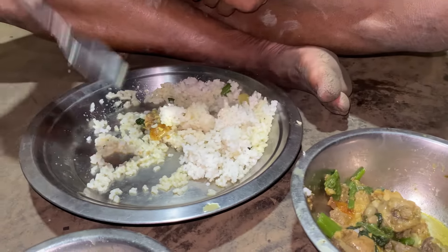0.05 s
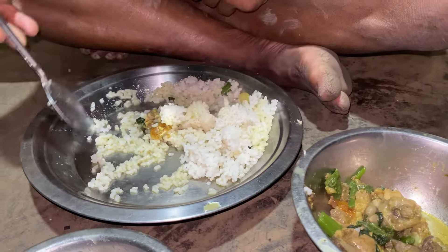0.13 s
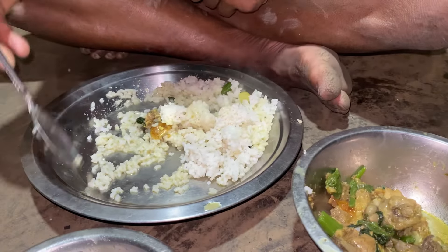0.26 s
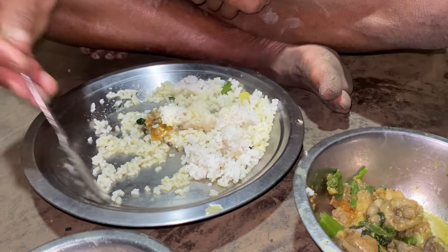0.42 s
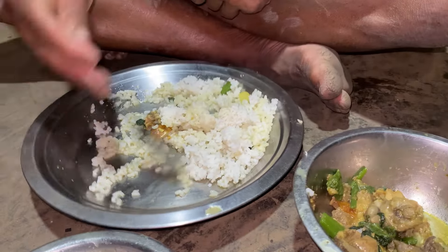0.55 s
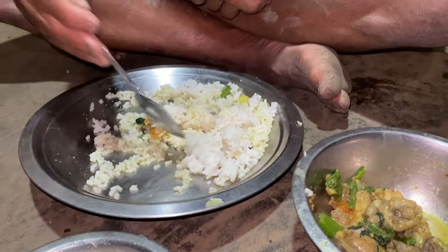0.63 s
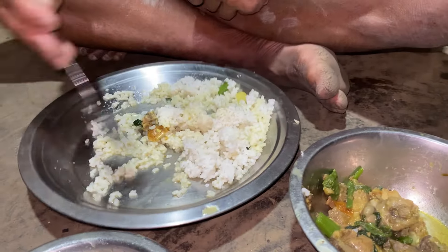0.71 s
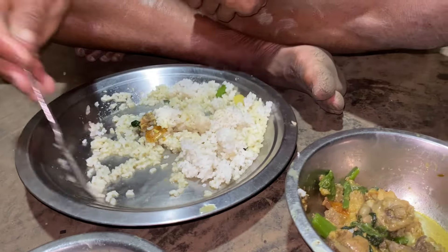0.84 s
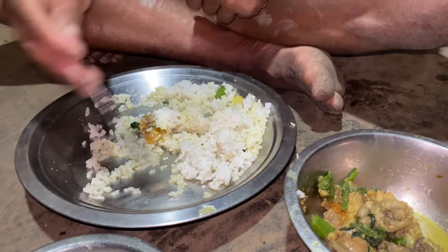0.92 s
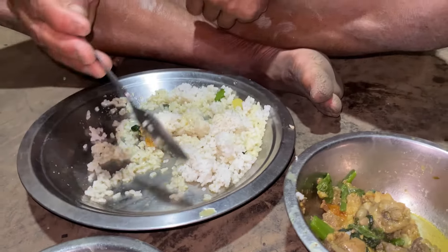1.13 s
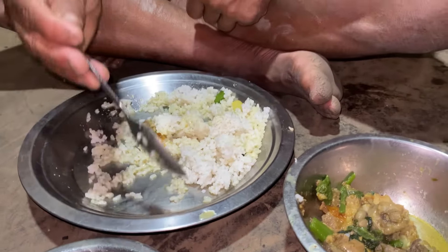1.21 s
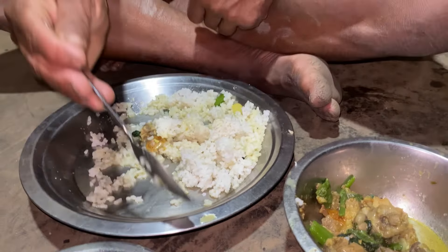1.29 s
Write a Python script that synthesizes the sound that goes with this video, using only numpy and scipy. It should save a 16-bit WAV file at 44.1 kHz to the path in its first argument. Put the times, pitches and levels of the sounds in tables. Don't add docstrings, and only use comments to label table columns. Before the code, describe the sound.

A metal spoon on a steel plate of rice, heard close in stereo. A clink at 0.2 seconds, then bright ringing taps and a short scrape from 0.37 to 0.52. Faint muffled touches follow around 0.65 to 0.75, a loud sharp clink with a brief skid at 0.8, then soft rice grains near 0.95 and a tiny dish note at 1.2. Small hard room, faint crickets, low hum.

```python
import sys
import numpy as np
from scipy import signal
from scipy.fft import rfft, irfft, next_fast_len
from scipy.io import wavfile
from scipy.ndimage import map_coordinates

SR = 44100
rng = np.random.default_rng(int(sys.argv[2]) if len(sys.argv) > 2 else 0)


def to_wav(sig):
    pcm = np.clip(np.atleast_2d(sig), -1, 1) * 32767
    pcm = np.round(pcm).astype(np.int16)
    wavfile.write(sys.argv[1], SR, pcm.T)


def attenuation_scalar(level_db):
    decades = np.asarray(level_db, float) / 20
    return 10 ** decades


N = 59535
TIME = np.arange(N) / SR


def unit(x):
    return x / np.sqrt(np.mean(x ** 2) + 1e-20)


def along(points, hz):
    f, value = np.transpose(points)
    return np.interp(np.log(hz + 1), np.log(f + 1), value)


def gain_curve(rows):
    s, db = np.transpose(rows)
    after = db[-1] if s[-1] > 1.2 else -120
    return attenuation_scalar(np.interp(TIME, s, db, left=-120, right=after))


def wobble(rate):
    knots = rng.standard_normal(int(N / SR * 400) + 4)
    return map_coordinates(knots, [np.arange(N) * min(rate, 400) / SR])


def filtered(x, response):
    m = next_fast_len(N + SR // 2)
    return irfft(rfft(x, m) * response(np.fft.rfftfreq(m, 1 / SR)), m)[..., :N]


def colour(points):
    return lambda hz: attenuation_scalar(along(points, hz))


def resonances(modes):
    def response(f):
        total = 0
        for centre, db, t60 in modes:
            damping = 1j * f * 2.2 / t60
            total = total + attenuation_scalar(db) * damping / (centre * centre - f * f + damping)
        return total
    return response


def grains(grainy_db, rate):
    return unit(rng.standard_normal((2, N)) * attenuation_scalar(grainy_db * wobble(rate)))


def hiss(response):
    return unit(filtered(rng.standard_normal((2, N)), response))


def ring(modes, t, pitch, fast):
    hz, db, t60 = np.transpose(modes)[..., None]
    louder, sharper = rng.standard_normal((2, len(hz), 1))
    strength = attenuation_scalar(db + 1.5 * louder - 60 * t / t60 * fast)
    tones = np.sin(2 * np.pi * pitch * hz * (1 + .006 * sharper) * t)
    return (strength * tones).sum(0)


# t/s, rim level/dB, bowl level/dB, spoon level/dB, bowl pitch f/Hz
TAPS = [(0.157, -58, -32, -46, 1140), (0.199, -36, -33, -53.5, 1710), (0.2016, -30, -34, -23, 1970),
        (0.2081, -38, -11.5, -12.5, 2010), (.371, -1.5, -21.5, -22.5, 1030), (0.4, -4, -42, -40, 1190),
        (0.449, -2, -24, -19, 1210), (0.4695, -27, -9, -12, 1268), (.645, -34, -32, -47, 1150),
        (0.649, -47, -29.5, -24.5, 660), (0.701, -56.5, -46, -28.5, 1010), (0.709, -58.5, -58, -33.5, 980),
        (0.748, -37, -55, -29.5, 940), (.752, -55, -28.5, -55.5, 877), (0.762, -55, -30, -62, 1085),
        (0.778, -60, -30, -59, 1110), (0.8063, -2.5, -14.5, -41.5, 1118), (0.8079, 3, -13.5, -42, 1372),
        (0.934, -55, -24.5, -55, 460), (.937, -63, -34, -50.5, 680)]
# f/Hz, level/dB, t60/s
RIM = [(4300, -7, .03), (4840, -9, .025), (5285, -7, .025), (5620, -8, .025), (5812, -1, .035),
       (5858, 0, .05), (6142, -3, .04), (6320, -6, .025), (7000, -7, .025), (7240, -7, .03),
       (7650, -10, .02), (11100, -10, .02), (12070, -8, .02), (12700, -9, .02)]
# multiple of its pitch, level/dB, t60/s
BOWL = [(.21, -24, .14), (.31, -22, .05), (.6, -26, .05), (1.0, 0, .036), (1.08, -15, .025),
        (1.15, -12, .03), (1.83, -20, .04)]
# f/Hz, level/dB, t60/s
SPOON = [(230, -19, .07), (420, -15, .05), (1750, -9, .03), (2120, -6, .03), (2400, -6, .025),
         (2694, 0, .035), (2792, -2, .045), (3130, -4, .03), (3930, -5, .03), (4290, -8, .04),
         (6800, -8, .02)]
# t/s, f/Hz, level/dB, t60/s
SPOTS = [(0.2008, 6650, -21, 0.062), (0.203, 3230, -9.5, 0.017), (0.208, 2850, -36, 0.052),
         (.207, 1953, -18, 0.026), (.207, 406, -22.5, 0.051), (.206, 240, -27.5, 0.064),
         (0.207, 6460, -19.5, .012), (0.373, 1043, -27, 0.093), (.371, 1345, -30, 0.12),
         (0.37, 2440, -22.5, 0.042), (0.372, 4500, -15, 0.013), (.371, 6250, -10.5, 0.013),
         (.398, 2265, -19, .035), (.398, 1200, -31.5, 0.096), (0.425, 7240, -19.5, 0.073),
         (0.452, 4880, -17, 0.053), (.464, 7086, -12.5, .04), (0.4694, 1170, -1.5, 0.036),
         (.485, 1161, -24.5, 0.11), (.485, 1090, -29.5, 0.12), (.471, 344, -18, .05),
         (.471, 780, -32, 0.041), (.371, 650, -32, 0.072), (.371, 242, -35, 0.14), (.451, 1260, -17, .06),
         (0.806, 1082, -20.5, 0.16), (0.808, 1341, -21.5, 0.13), (.807, 1220, -22, 0.1),
         (0.808, 1450, -18.5, 0.038), (0.809, 339, -27.5, 0.062), (.808, 678, -32, 0.13),
         (0.808, 4265, -14, 0.032), (0.808, 4770, -12.5, 0.027), (.807, 5160, -15.5, .04),
         (0.811, 4510, -19, 0.028)]
# t/s, level/dB
CLICKS = [(.157, -42), (0.1989, -12), (.208, -20.5), (0.372, -15), (0.397, -14.5), (0.451, -15),
          (0.4687, -8.5), (0.513, -25), (0.643, -36.5), (0.6483, -31.5), (0.683, -42), (.709, -41.5),
          (.749, -41.5), (.807, -4.5), (0.808, -18.5)]
# f/Hz, level/dB
CLICK_COLOUR = [(180, -50), (300, -46.5), (1290, 5), (3100, 1.5), (6200, 5.5), (9000, 21), (12600, 2),
                (14400, -32)]


def taps():
    ringing, cracks = np.zeros(N + SR), np.zeros(N + SR)
    t = np.arange(SR // 4) / SR
    rise = 1 - np.exp(-t / .0006)
    crack_t60 = .013
    soft_db, muffle = -25, .14
    for s, rim_db, bowl_db, spoon_db, bowl_hz in TAPS:
        fast = 1.5 + muffle * max(soft_db - max(rim_db, bowl_db, spoon_db), 0)
        rim = attenuation_scalar(rim_db - 9.5) * ring(RIM, t, 0.97, 2.2 * fast)
        bowl = attenuation_scalar(bowl_db) * ring(BOWL, t, bowl_hz, fast)
        spoon = attenuation_scalar(spoon_db - 4.0) * ring(SPOON, t, 0.97, fast)
        ringing[round(s * SR):][:len(t)] += rise * (rim + bowl + spoon)
    for s, hz, db, t60 in SPOTS:
        tone = attenuation_scalar(db - 60 * t / t60) * np.sin(2 * np.pi * hz * t)
        ringing[round(s * SR):][:len(t)] += rise * tone
    for s, db in CLICKS:
        burst = attenuation_scalar(db - 60 * t / crack_t60) * rng.standard_normal(len(t))
        cracks[round(s * SR):][:len(t)] += rise * burst
    return ringing[:N] + filtered(cracks[:N], colour(CLICK_COLOUR))


def radiated(x):
    return filtered(x, lambda hz: (1j * hz / (190 + 1j * hz)) ** 2)


# t/s, level/dB
DRAG = [
    (.369, -54),
    (.373, -22),
    (.39, -26.5),
    (.44, -30.5),
    (.458, -27),
    (.468, -14.5),
    (.475, -51),
    (.51, -30),
    (.525, -44.5),
]
# t/s, level/dB
SKID = [
    (.806, -53),
    (.812, -23),
    (.822, -50),
    (.826, -28.5),
    (.838, -34),
    (.853, -33.5),
    (.857, -40),
    (.875, -61.5),
]
# f/Hz, level/dB
DRAG_COLOUR = [(800, -9.5), (2500, -2), (3700, -8), (5600, -6), (8000, -12), (12500, -2), (14000, 5),
               (16500, -36)]
# t/s, level/dB, half
# length/s, tone f/Hz
RUBS = [(0.188, -35.5, .002, 5130), (.205, -11.5, 0.002, 2740), (0.3981, -10, .0012, 5790),
        (0.402, -13, .0015, 5800), (.4245, -15.5, .0035, 5860), (.432, -20, .002, 5300),
        (0.4393, -15.5, .0015, 5850), (0.444, -19.5, .002, 6100), (.452, -18.5, .002, 5820),
        (0.4734, -21.5, .002, 5880), (0.737, -42, .006, 6100), (.7985, -36, .002, 5850),
        (0.8025, -23, .0015, 5900), (0.826, -18, .0015, 6250), (0.849, -28.5, .003, 5850)]


def drag():
    slips = grains(2.2, 350)
    grit = unit(filtered(slips, colour(DRAG_COLOUR)))
    singing = unit(filtered(slips, resonances(RIM)))
    rubs = 0
    for s, db, half, hz in RUBS:
        swell = attenuation_scalar(db) * np.exp(-((TIME - s) / half) ** 2)
        rubs = rubs + swell * (np.sin(2 * np.pi * hz * TIME) + attenuation_scalar(-8) * singing)
    dragging = gain_curve(DRAG) * (grit + attenuation_scalar(-1) * singing)
    skidding = gain_curve(SKID) * (grit + attenuation_scalar(-3.5) * singing)
    return dragging + skidding + rubs


# t/s, level/dB
RICE = [(0, -45), (.1, -67.5), (.16, -41), (.196, -43.5), (.202, -28.5), (.225, -29.5), (.31, -46),
        (.6, -51), (.65, -44.5), (.68, -61), (.75, -47.5), (.79, -51), (.88, -43.5), (.94, -34),
        (1.0, -38.5), (1.07, -59.5), (1.18, -63), (1.3, -48.5)]
# f/Hz, level/dB
RICE_COLOUR = [(150, -12), (700, -17), (1500, -5.5), (3000, -0.5), (6000, -4), (9000, -4.5), (12500, -4.5),
               (16000, -7.5)]
# t/s, level/dB
PRESS = [(0, -3.5), (.1, 4.5), (.2, -20), (.6, -4), (.88, -2), (.94, -12), (1.05, 1.5), (1.12, -13),
         (1.35, -14)]
# f/Hz, level/dB, t60/s
LOADED_PLATE = [(450, -3, .03), (700, 0, .03), (1360, -2, .03), (1800, -4, .025), (2650, -6, .03)]


def rice():
    push = grains(1.5, 220)
    crunch = unit(filtered(push, colour(RICE_COLOUR)))
    patches = gain_curve(PRESS) * attenuation_scalar(2.1 * wobble(25))
    voice = patches * unit(filtered(push, resonances(LOADED_PLATE)))
    return gain_curve(RICE) * (crunch + voice)


# t/s, level/dB, f/Hz, rise/s, t60/s
DISH = (1.215, -32, 1104, .007, .085)


def ping():
    s, db, hz, rise, t60 = DISH
    t = np.maximum(TIME - s, 0)
    swell = 1 - np.exp(-(t / rise) ** 2)
    return attenuation_scalar(db - 60 * t / t60) * swell * np.sin(2 * np.pi * hz * t)


# f/Hz, t60/s
ROOM = [(200, 0.56), (2000, 0.16), (6000, 0.25), (14000, 0.2)]


def room(x):
    hz, t, z = signal.stft(rng.standard_normal((2, SR // 2)), SR, nperseg=256)
    fading = attenuation_scalar(-60 * t / along(ROOM, hz)[:, None])
    tail = signal.istft(z * fading, SR, nperseg=256)[1]
    late = np.pad(x, (200, 0))[None]
    return signal.fftconvolve(late, tail / np.linalg.norm(tail[0]), axes=1)[:, :N]


# f/Hz, width/Hz, level/dB, swells per s
CRICKETS = [
    (3584, 220, -52.5, 74),
    (5176, 95, -56, 30),
]


def crickets():
    song = 0
    for hz, width, db, rate in CRICKETS:
        band = hiss(lambda f: 1 / (1 + ((f - hz) / width) ** 4))
        song = song + attenuation_scalar(db + 2.2 * wobble(rate)) * band
    return song


# t/s, level/dB
STIR = [(0, 3), (.08, -1.5), (.3, 6), (.6, -0.5), (1.06, -8), (1.12, -3), (1.19, 5.5), (1.35, -0.5)]
# f/Hz, level/dB
AIR = [(600, -17), (1000, -4.5), (2500, -4), (4000, 1), (6000, -4.5), (9000, -1), (13000, -7),
       (16000, -3.5)]


def air():
    drift = attenuation_scalar(-49.5 + 1.2 * wobble(2.8))
    return gain_curve(STIR) * drift * hiss(colour([(150, -19)] + AIR))


# t/s, level/dB
HUM = [(0, -39.5), (.05, -56), (.13, -49), (.3, -55.5), (.5, -53.5), (.75, -55), (.9, -58.5), (.97, -52.5),
       (1.05, -67), (1.35, -60)]
# f/Hz, level/dB
HUM_COLOUR = [(25, -29.5), (50, 2), (100, -4.5), (250, -9), (450, -8), (900, -61)]


def hum():
    return gain_curve(HUM) * attenuation_scalar(1.8 * wobble(10.85)) * hiss(colour(HUM_COLOUR))


# f/Hz, likeness 0 to 1
ALIKE = [(40, .3), (200, .85), (750, .4), (1200, .7), (2300, .45), (3500, .4), (6000, .55), (7400, .6),
         (8300, .995), (9900, .995), (11500, .92)]


def likeness(hz):
    return np.clip(along(ALIKE, hz), 0, 1)


def near(x):
    gap = 1.1 * rng.standard_normal(60)
    knots_hz = np.linspace(0, SR / 2, len(gap))
    loose = lambda hz: np.interp(hz, knots_hz, gap) * (1 - likeness(hz))
    return filtered(x, lambda hz: np.exp(1j * np.outer([1, -1], loose(hz))))


def spread(pair):
    turn = lambda hz: np.arccos(likeness(hz)) / 2
    mid, side = filtered(pair, lambda hz: np.array([np.cos(turn(hz)), np.sin(turn(hz))]))
    return np.array([mid + side, mid - side])


def scene():
    hits, rub = radiated(taps()), drag()
    answer = attenuation_scalar(-11.5) * room(hits + rub[0])
    wide = rub + rice() + answer + crickets() + air() + hum()
    return near(hits) + ping() + spread(wide)


# f/Hz, level/dB
BALANCE_DB = [(200, 0), (650, -5.5), (1200, -3), (2500, -2), (5000, -1), (6500, 0), (7400, 2), (8200, 0)]
# f/Hz, level/dB
MIC = [(13400, 0), (14100, -9), (16500, -16)]


def microphones(dry):
    half = np.array([[.5], [-.5]])
    turn = lambda hz: 2 * np.pi * np.maximum(hz / 6130 - 1, 0)
    lag = lambda hz: turn(hz) - .45 * np.sin(2 * turn(hz))
    gain = lambda hz: attenuation_scalar(half * along(BALANCE_DB, hz) + along(MIC, hz))
    return filtered(dry, lambda hz: gain(hz) * np.exp(1j * half * lag(hz)))


def soft_clip(x):
    return x / (1 + np.abs(x / 1.04) ** 8) ** (1 / 8)


def low_pass(x):
    return signal.sosfilt(signal.butter(12, 14540, fs=SR, output="sos"), x)


def record(dry):
    mix = soft_clip(microphones(dry))
    return low_pass(mix)


dry = scene()
out = record(dry)
to_wav(out)
```